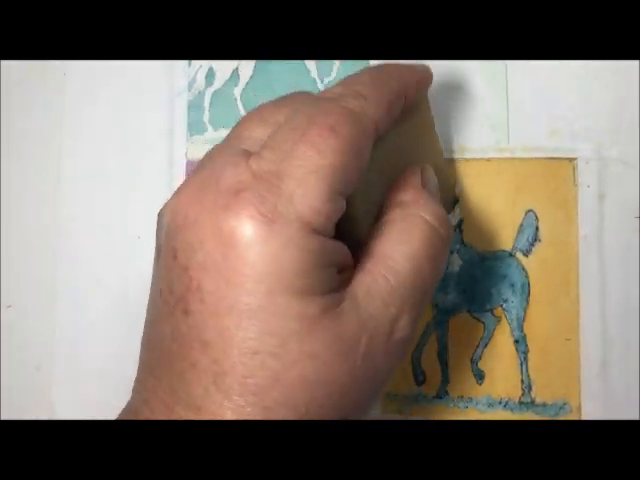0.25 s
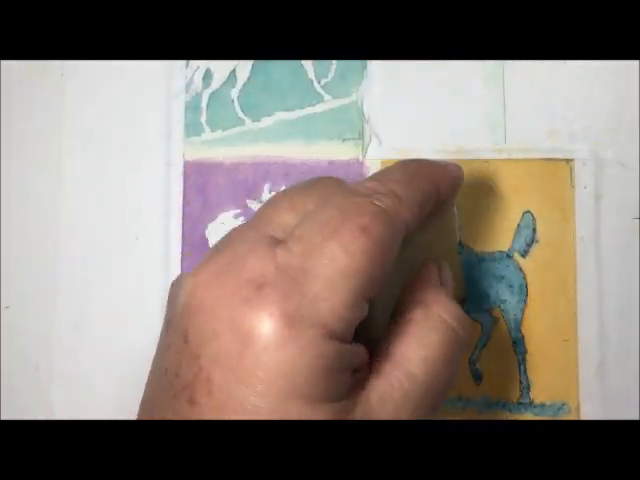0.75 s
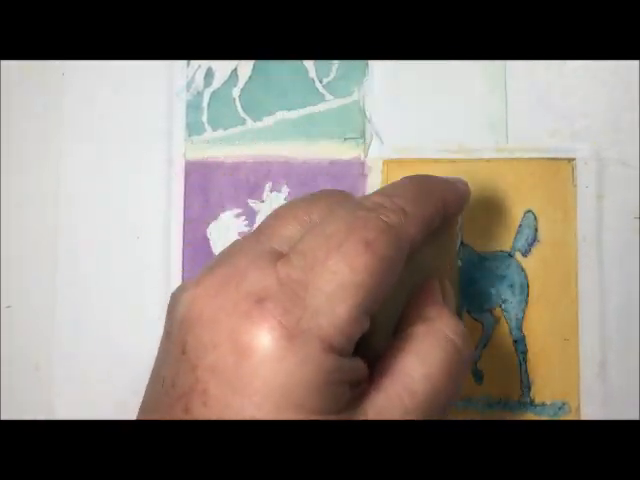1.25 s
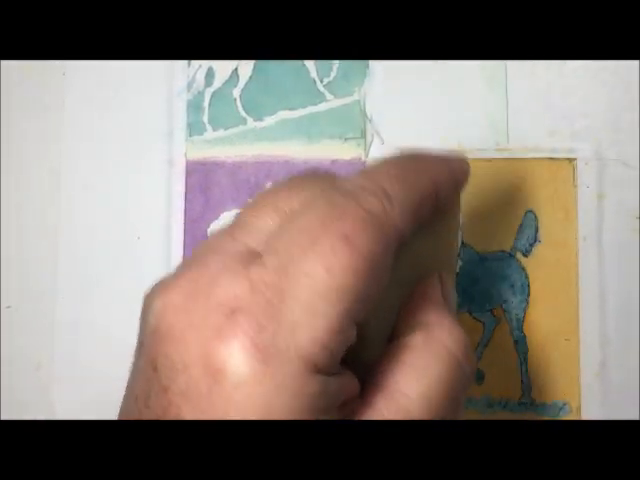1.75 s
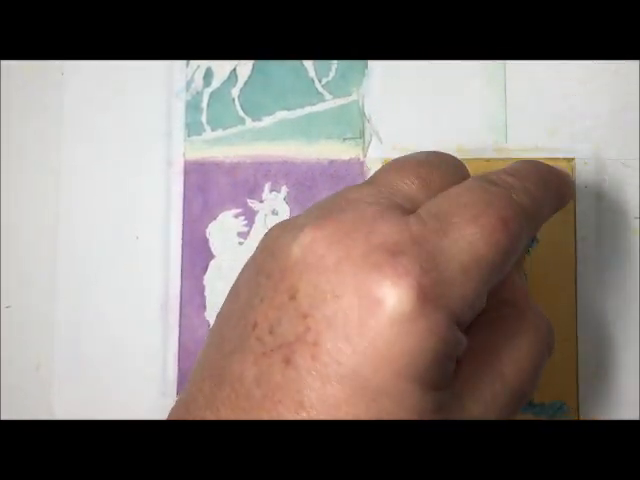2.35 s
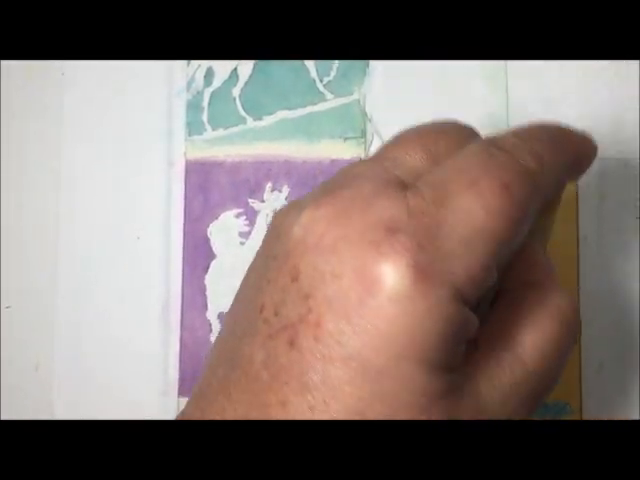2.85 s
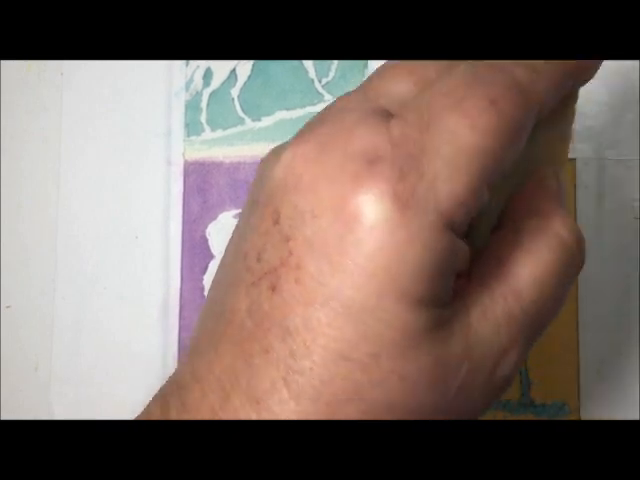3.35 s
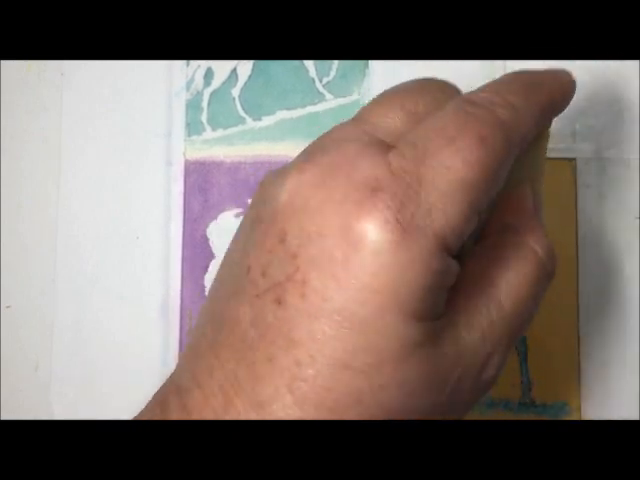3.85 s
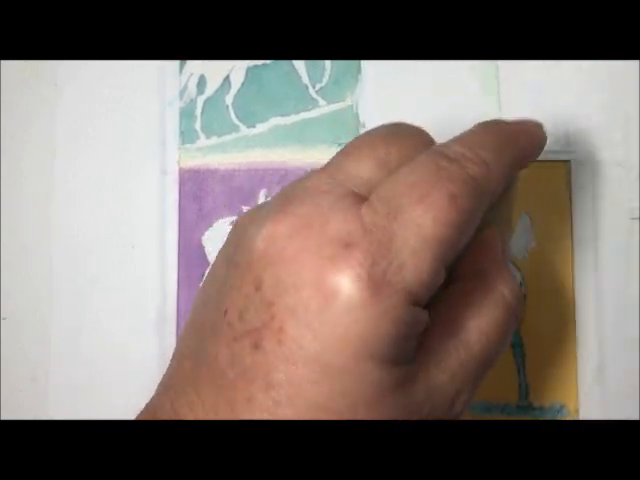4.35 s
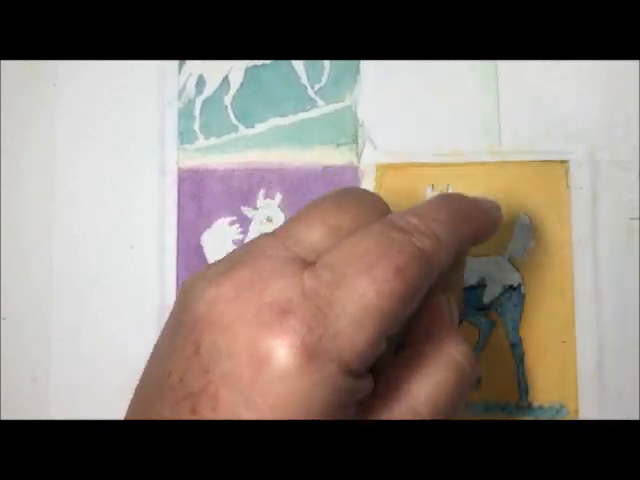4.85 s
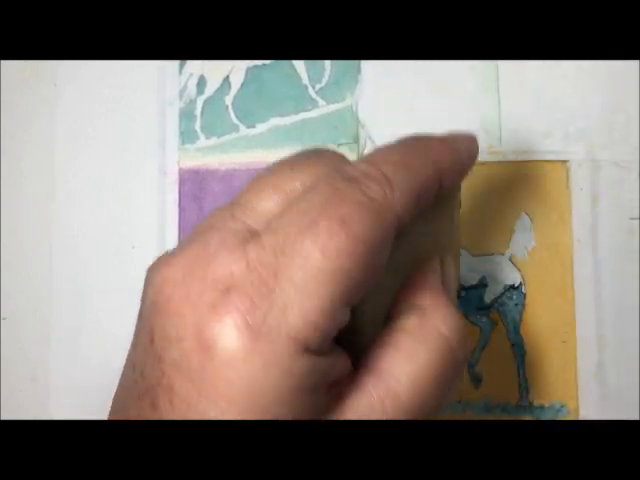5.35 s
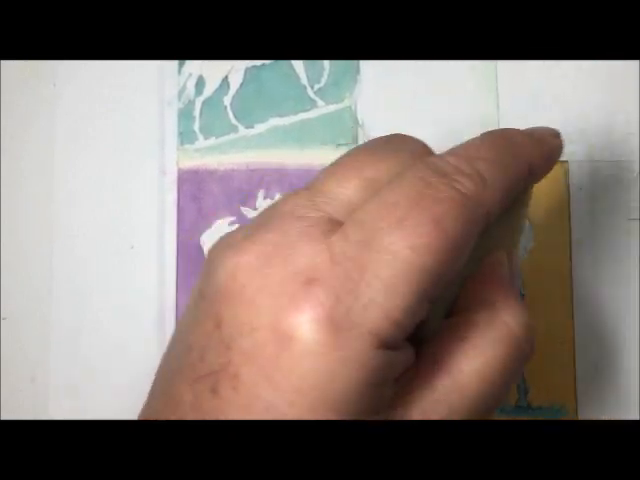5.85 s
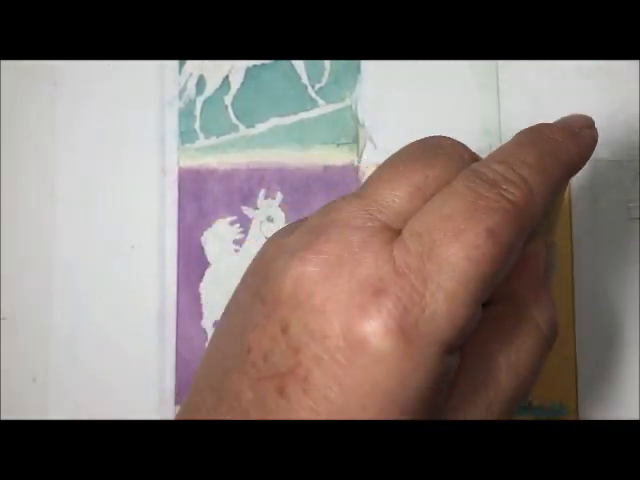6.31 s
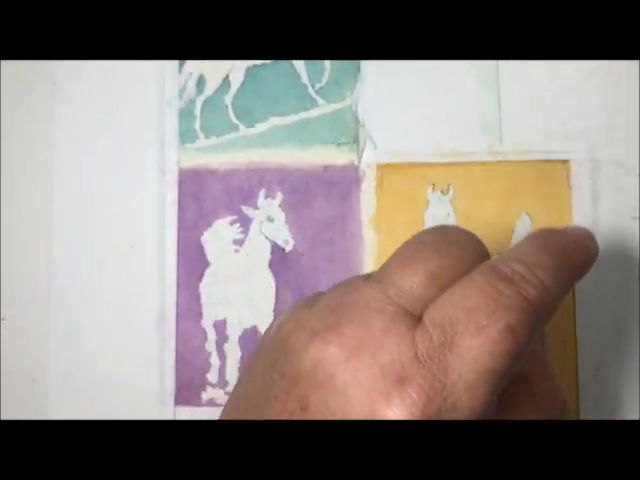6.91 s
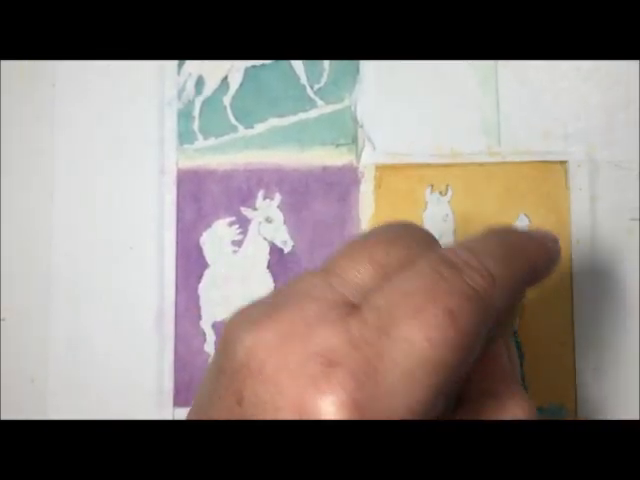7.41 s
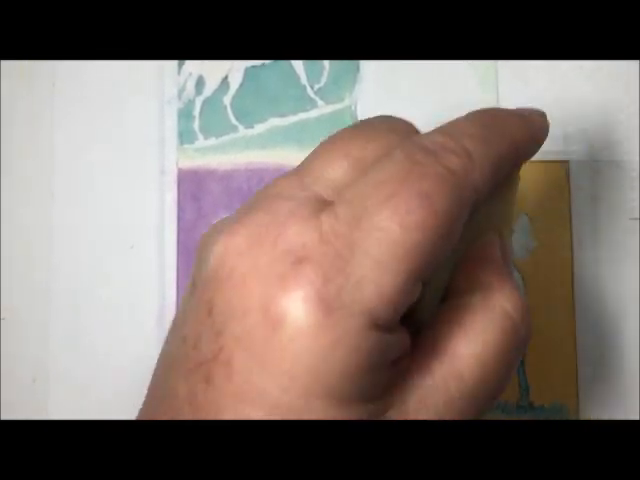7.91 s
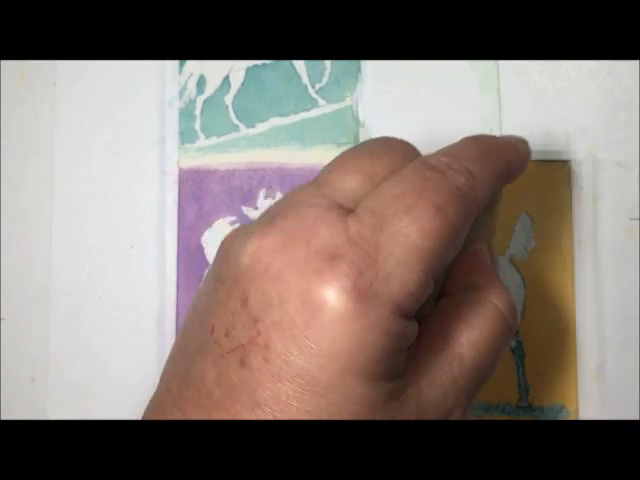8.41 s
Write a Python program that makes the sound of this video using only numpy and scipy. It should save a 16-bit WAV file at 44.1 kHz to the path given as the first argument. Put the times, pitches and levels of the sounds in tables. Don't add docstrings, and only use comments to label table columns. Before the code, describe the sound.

A rubber pad scrapes dried masking film off paper in short crisp strokes, tearing and snapping sharply, with soft table thuds over a low hum.

```python
import sys
import numpy as np
from scipy import signal
from scipy.fft import rfft, irfft, next_fast_len
from scipy.io import wavfile
from scipy.ndimage import uniform_filter1d, map_coordinates

SR = 44100
rng = np.random.default_rng(int(sys.argv[2]) if len(sys.argv) > 2 else 0)


def amplitude_ratio(level_db):
    exponent = np.asarray(level_db, float) / 20
    return 10 ** exponent


def bounce(signal):
    frames = np.transpose(np.atleast_2d(signal))
    limited = np.clip(frames, -1, 1)
    pcm = np.round(limited * 32767).astype(np.int16)
    wavfile.write(sys.argv[1], SR, pcm)


N = 382347


def unit(x):
    return x / np.sqrt(np.mean(x ** 2) + 1e-20)


def along(points, hz):
    f, value = np.transpose(points)
    return np.interp(np.log(hz + 1), np.log(f + 1), value)


def wobble(rate):
    knots = rng.standard_normal(int(N * rate / SR) + 4)
    return map_coordinates(knots, [np.arange(N) * rate / SR])


def filtered(x, response):
    m = next_fast_len(N + SR // 2)
    return irfft(rfft(x, m) * response(np.fft.rfftfreq(m, 1 / SR)), m)[..., :N]


def noise(spectrum):
    return unit(filtered(rng.standard_normal(N), lambda hz: amplitude_ratio(along(spectrum, hz))))


def resonate(x, modes, order=2):
    def once(hz):
        total = 0
        for k, (centre, width, db) in enumerate(modes):
            damping = 1j * hz * width
            total = total + (-1) ** k * amplitude_ratio(db / order) * damping / (centre * centre - hz * hz + damping)
        return total

    click = filtered(signal.unit_impulse(N), lambda hz: once(hz) ** order)
    return filtered(x, lambda hz: once(hz) ** order) / np.abs(click).max()


def bursts(times, db, life, build=0.00014, crack=5.7):
    k = np.arange(-SR // 50, SR // 50)
    t = k / SR
    build = np.clip(np.reshape(build, (-1, 1)), 1e-4, .008)
    swell = amplitude_ratio(np.where(t < 0, 10 * t / build, -60 * t / life))
    shape = rng.standard_normal((len(times), len(t))) * swell - crack * (k == 0)
    shape /= np.linalg.norm(shape * amplitude_ratio(-20 * np.abs(t) / 0.013), axis=1, keepdims=True)
    where = np.round(np.asarray(times) * SR).astype(int)[:, None] + k + SR
    return np.bincount(where.ravel(), (shape * amplitude_ratio(db)[:, None]).ravel(), N + 2 * SR)[SR:SR + N]


def rings(s, db, ring_hz, build, t60):
    k = np.arange(-SR // 200, SR // 60)
    t = k / SR
    stray = np.cumsum(.05 * rng.standard_normal((len(s), len(t))), axis=1)
    phase = 2 * np.pi * ring_hz[:, None] * t + stray
    swell = np.where(t < 0, 10 * t / np.clip(build[:, None], 5e-5, .008), -60 * t / t60)
    where = np.round(s * SR).astype(int)[:, None] + k
    return np.bincount(where.ravel(), (amplitude_ratio(db[:, None] + swell) * -np.sin(phase)).ravel(), N + SR)[:N]


def grit(slips, spread_db, smooth, clump_db):
    chance, size, side = rng.random((3, N))
    slip = (chance < slips / SR) * amplitude_ratio(-spread_db * np.log(size + 0.00033)) * np.sign(side - .5)
    clumps = amplitude_ratio(clump_db * (wobble(45) + wobble(170)))
    return unit(clumps * (unit(slip) + smooth * rng.standard_normal(N)))


def steadied(force, span_s, top):
    power = np.abs(uniform_filter1d(force ** 2, round(span_s * SR)))
    return np.clip(force / np.sqrt(power + 1e-3), -top, top)


# frequency in Hz, level in dB per Hz.
HUM_SPECTRUM = [(15, -69), (30, -23), (58, -5.5), (100, -11), (148, 4.5), (172, -11.5), (197, 0.5),
                (235, -11.5), (300, -9.5), (400, -35), (900, -120)]
# frequency in Hz, level in dB per Hz.
AIR_HISS_SPECTRUM = [(210, -32), (350, -9.5), (480, -19), (570, -14.5), (823, -14.5), (1930, -19),
                     (3800, -23.5), (4850, -25), (5600, -25), (9500, -28.5), (10500, -34.5), (11500, -28.5),
                     (15500, -33.5), (17000, -28)]


def background():
    z = signal.stft(noise(HUM_SPECTRUM), nperseg=2048)[2]
    field = uniform_filter1d(rng.standard_normal(z.shape), size=2, axis=0)
    field = unit(uniform_filter1d(field, size=3, axis=1))
    hum = signal.istft(z * amplitude_ratio(3 * field), nperseg=2048)[1][:N]
    hum = unit(amplitude_ratio(1.5 * wobble(5) + 2 * wobble(15)) * hum)
    return amplitude_ratio(-54.5) * hum + amplitude_ratio(-69.5 + 0.23 * wobble(1.572)) * noise(AIR_HISS_SPECTRUM)


def ramp(t, start, end, up, down):
    return up * np.minimum(t - start, 0) - down * np.maximum(t - end, 0)


# start in seconds, length in seconds, scrape level in dB, hiss level in dB.
DRAGS = [(0.022, 0.06, -45, -55.5), (0.432, 0.11, -51, -64.5), (0.529, 0.026, -55.5, -53),
         (0.896, 0.0071, -41.5, -49), (0.946, 0.079, -54, -61.5), (1.346, 0.037, -53, -74.5),
         (1.395, 0.04, -45.5, -52.5), (1.54, 0.055, -42.5, -64), (1.82, 0.034, -42, -49.5),
         (2.209, 0.0094, -50, -80), (2.458, 0.12, -50, -62), (2.897, 0.12, -50, -59),
         (3.318, 0.16, -52, -61), (3.714, 0.055, -56.5, -71.5), (3.808, 0.093, -48, -55.5),
         (4.203, 0.13, -45.5, -55.5), (4.626, 0.093, -48, -53.5), (5.016, 0.11, -51, -60.5),
         (5.377, 0.052, -47.5, -57.5), (5.442, 0.042, -52.5, -52.5), (5.515, 0.077, -49.5, -52),
         (5.705, 0.24, -58.5, -62.5), (5.912, 0.076, -43.5, -50), (6.677, 0.076, -49.5, -59),
         (6.847, .02, -49.5, -56.5), (7.115, 0.057, -45.5, -51.5), (7.493, 0.081, -49, -55),
         (7.874, 0.071, -48.5, -57.5), (7.937, 0.06, -51, -61), (8.296, 0.12, -46, -51.5)]
# peak in seconds, scrape level in dB, hiss level in dB.
PEELS = [(0.615, -34, -44), (1.055, -49.5, -45.5), (1.53, -39, -45), (1.901, -33.5, -39),
         (2.545, -57, -54.5), (2.632, -45, -52), (3.394, -43.5, -50.5), (4.226, -34, -43),
         (5.029, -41.5, -45.5), (5.17, -36, -39), (5.805, -40, -50.5), (5.953, -37.5, -47.5),
         (6.135, -36, -50.5), (6.76, -38, -45), (7.522, -37, -50.5)]
HISS_STEEPER = 1.07


def contact(steeper, column):
    grip, lift = 755.5, 701
    t, power = np.arange(0, N + 64, 64) / SR, 1e-12
    for s, length, *db in DRAGS:
        bite = ramp(t, s, s + length, grip, lift)
        landing = -12 + ramp(t, s, s, 146, lift)
        power = power + amplitude_ratio(db[column] + steeper * bite) ** 2 + amplitude_ratio(db[column] + steeper * landing) ** 2
    for s, *db in PEELS:
        power = power + amplitude_ratio(db[column] + steeper * ramp(t, s, s, 594.5, 703.5)) ** 2
    return np.interp(np.arange(N) / SR, t, 10 * np.log10(power))


# time in seconds, frequency in Hz.
SINGING_PLACE = [(0.45, 2350), (1.0, 2450), (1.56, 2098), (2.2, 2790), (2.95, 2663), (3.45, 2740),
                 (4.3, 2280), (5.5, 2350), (5.56, 1630), (5.65, 2300), (6.7, 2864), (7.55, 2900),
                 (8.4, 2715)]


def patchy(x, patchy_db, sing_db=0):
    hz, t, z = signal.stft(x, SR, nperseg=256)
    field = uniform_filter1d(rng.standard_normal(z.shape), size=3, axis=0)
    field = uniform_filter1d(field, size=14, axis=1)
    singing_hz = np.interp(t, *np.transpose(SINGING_PLACE))
    lift = np.exp(-((hz[:, None] - singing_hz) / 450) ** 2)
    return signal.istft(z * amplitude_ratio(patchy_db * unit(field) + sing_db * lift), nperseg=256)[1][:N]


# centre in Hz, width in Hz, level in dB.
SHEET_MODES = [(690, 783, -5), (932, 707, 2.5), (1342, 454, 1.5)]
BODY_MODES = [(1600, 360, -8), (2324, 386, 0.5), (2850, 312, 0.5), (3170, 290, 0), (3775, 440, -9.5)]
CRISP_MODES = [(4335, 920, -2.5), (5470, 834, 0.5), (6800, 1720, -5.5)]
AIR_MODES = [(8060, 2200, -4), (12000, 5900, -1), (16140, 7700, -4)]


def scrape():
    scrape_db, hiss_db = contact(1, column=0), contact(HISS_STEEPER, column=1)
    force = grit(slips=1800, spread_db=3, smooth=.4, clump_db=3.2)
    force = steadied(force, span_s=.035, top=11)
    fine = force + .8 * grit(slips=2000, spread_db=3, smooth=.3, clump_db=3.2)
    fine = steadied(fine, span_s=.035, top=9)
    low = unit(resonate(force, BODY_MODES)) + amplitude_ratio(-9.0) * unit(resonate(force, SHEET_MODES))
    between = amplitude_ratio((scrape_db + hiss_db) / 2 - 10.5) * unit(resonate(fine, CRISP_MODES))
    hiss = amplitude_ratio(hiss_db - 5.5) * unit(resonate(fine, AIR_MODES))
    grain = amplitude_ratio(scrape_db - 8.0) * low + between
    return patchy(grain, patchy_db=4.5, sing_db=3) + patchy(hiss, patchy_db=3.5)


def crumbs():
    crumbs_per_s = 600
    place, size = rng.random((round(crumbs_per_s * N / SR), 2)).T
    s = .01 + place * (N / SR - .02)
    both_db = contact(0.99, column=0) + contact(HISS_STEEPER, column=1)
    level_db = both_db[(s * SR).astype(int)] / 2
    ring_hz = np.clip(3800 * np.exp(.45 * rng.standard_normal(len(s))), 1200, 14000)
    db = level_db - 4 - 4 * np.log(size + .01)
    on = level_db > -68
    return rings(s[on], db[on], ring_hz[on], np.full(on.sum(), .0002), t60=0.0038)


# peak in seconds, peak in dB, ring in Hz, crisp level and air level in dB relative to the peak.
RIPS = [(0.6282, -18, 3170, 4, -2.5), (0.9477, -24, 2450, 0.5, 0.5), (1.0629, -22, 2310, -1.5, -3),
        (1.527, -24, 2210, 0, -8), (1.5356, -20, 2380, -1.5, -12), (1.5387, -26, 2260, 6.5, -6),
        (1.895, -9, 2160, -6.5, -7.5), (1.8976, -15, 2230, -5, -11.5), (2.538, -33, 2410, -1, 12.5),
        (2.6221, -15, 2330, -1.5, -8.5), (3.0435, -30.5, 1410, 7, -2.5), (3.4758, -27.5, 2260, -4, -14),
        (3.8372, -24.5, 2250, -10, -10.5), (3.8794, -18, 2330, -3.5, -13),
        (4.6634, -25.5, 2510, -12.5, -2.5), (5.109, -26.5, 2440, -11, -15), (5.1405, -27, 2290, -1, -7.5),
        (5.1684, -16.5, 2410, -17, -5.5), (5.171, -22.5, 2260, 6, -1.5), (5.5359, -27.5, 2140, 0, -12),
        (5.5506, -25, 1660, -7, -16), (5.9059, -23.5, 2270, 0.5, -11), (5.9345, -24.5, 2260, -1.5, -12),
        (5.943, -7, 2270, -16, -25), (5.9658, -26, 2200, -16, -12), (5.9784, -20.5, 2150, 0, -12.5),
        (6.093, -33, 2300, -7, -13), (6.1149, -24, 3060, -8, -24), (6.1275, -22.5, 3150, -7, -24),
        (6.1348, -12, 2380, 2.5, -10.5), (6.7608, -22.5, 2450, -16, 1.5), (6.85, -30, 2280, 3.5, -8),
        (6.8656, -23.5, 2330, -0.5, -11), (7.1564, -25.5, 2890, -5.5, 12), (7.5497, -29, 3550, 11.5, 11),
        (8.4314, -20.5, 2100, -14, -9)]
SNAPS = [(0.0447, -34.5, 3310, -11.5, 6), (0.5482, -36, 2260, -3.5, 0.5), (0.5843, -42, 3290, 4, -10.5),
         (0.6015, -26.5, 3110, -15, -21), (0.609, -33, 3780, -5.5, -22), (0.612, -39, 3230, 1.5, -12),
         (0.6149, -36, 3160, -3.5, -9), (0.624, -35, 3170, -5, -9.5), (0.988, -34, 2540, -13, -11),
         (1.0393, -36, 2370, 0, -11), (1.0537, -28.5, 2420, -1, -3), (1.4278, -31.5, 2530, -1.5, 1.5),
         (1.5072, -39.5, 2310, 2, 9), (1.515, -29, 2150, -9, -16), (1.5238, -22, 2250, -5, -14),
         (1.571, -33, 2387, -6, -15), (1.5936, -28, 2170, -22, -27), (1.8192, -39.5, 2560, -1, 2),
         (1.8456, -36, 3650, -7.5, -10), (2.55, -33.5, 2750, -14, -9.5), (2.922, -36, 2750, -1.5, 3),
         (3.0038, -33, 1640, -11.5, -4), (3.036, -34, 2340, 5, -5), (3.3858, -43.5, 2270, -0.5, 17),
         (3.4248, -27.5, 2550, -8, -4), (3.4593, -35, 1420, -2, -7), (3.4665, -45, 2800, 3, -5.5),
         (3.8244, -33.5, 2790, -10, 1), (3.8625, -29.5, 1393, -14, -13), (4.243, -33, 2310, -7, -14),
         (4.2735, -29.5, 1750, -2.5, 2), (4.2896, -30.5, 2200, -12, -2), (4.323, -41, 2390, -11, -13),
         (4.3492, -41.5, 2070, 6, -2), (4.6325, -33, 2590, -11, -6), (4.6593, -29.5, 2480, -5, -5.5)]
LATE_SNAPS = [(4.6825, -28, 2230, -18, -14), (4.6949, -31, 3220, -13, -12), (5.0157, -45.5, 3610, 4, 14.5),
              (5.049, -26, 2570, -13, -3.5), (5.0514, -25.5, 2520, -8.5, -8.5),
              (5.0591, -32, 2390, -6, -9.5), (5.0924, -25.5, 2560, -6, -8), (5.1572, -43, 2290, 7, 2),
              (5.4604, -41, 3230, 7, 11), (5.472, -40.5, 2400, 2, -1), (5.5119, -37.5, 2290, 4.5, 12),
              (5.526, -37, 2280, 4, -9), (5.562, -32, 2370, 2.5, -14), (5.5814, -36, 3060, 6, 1.5),
              (5.7896, -46, 2350, -3, 14), (5.8074, -33.5, 2250, -8, -6), (5.9506, -24.5, 2250, -6, -4),
              (5.9619, -37.5, 3040, -0.5, -9), (5.9707, -27, 2260, -7, -8), (5.973, -24.5, 2350, -9, -6),
              (6.6824, -37.5, 2500, -11, -5.5), (6.7312, -39.5, 2820, -12, 10.5),
              (6.8372, -38, 2260, -5, -15), (6.8531, -28, 2750, -5, -17), (6.856, -34, 2220, 3, -1),
              (7.1715, -41.5, 3600, -1, 6), (7.5197, -38.5, 3120, -12.5, -11),
              (7.5302, -28.5, 2830, -13, -10), (7.5707, -47, 3600, 11, 12), (7.9316, -31.5, 3740, -3.5, 3),
              (7.9934, -34, 2300, -2, -1), (8.3306, -37.5, 2270, 3.5, -0.5),
              (8.3702, -25.5, 2260, -1.5, -8), (8.3908, -39, 3180, 3, 1), (8.4175, -43, 2290, -3, -13),
              (8.4256, -36.5, 3140, 2.5, -18)]
CRACKLES = [(0.069, -34, 3570, 2, 4.5), (0.62, -36, 3120, -4, -16), (0.9712, -33.5, 3170, -12.5, -12),
            (1.0572, -33.5, 2310, -1, -8), (1.4091, -31.5, 3300, -2, -7.5), (1.5184, -31, 2100, 3, -5),
            (1.5297, -30, 2380, 11, -4), (1.5575, -23, 2270, -19, -22), (1.564, -35, 2233, -19.5, -26.5),
            (1.5793, -35, 2460, -2, -20), (1.8244, -38, 2490, -18, -15),
            (1.8431, -33.5, 2340, -10.5, -12.5), (1.8493, -37, 2280, -10, -14),
            (2.52, -48, 2450, -13.5, -7), (2.5537, -30.5, 2270, -14.5, -7), (2.5684, -31, 2260, -3, -3),
            (3.0072, -39, 2310, -13, -1), (4.2094, -30.5, 1410, -7, -8.5), (4.2151, -32, 1730, -6, -7),
            (4.2182, -32, 1394, -13, -12), (4.2202, -29, 1790, -6.5, -13), (4.228, -34.5, 1670, -13, -13),
            (4.3524, -38.5, 2155, -7, -2), (4.6655, -27, 2660, -15, -12), (4.6788, -32, 3200, -11, -9),
            (4.692, -35, 2200, -4.5, -8), (5.097, -25.5, 2500, -8, -2), (5.1625, -36, 2255, 2, 2),
            (5.4203, -34.5, 2330, -7.5, -11.5), (5.5728, -34, 2340, -6, -13), (5.9123, -37, 2310, 2, -5.5),
            (5.9248, -32.5, 2300, 4, -11), (5.982, -30.5, 1520, -12.5, -14), (7.9338, -35.5, 3360, 3.5, 2),
            (8.3564, -36.5, 2250, -1, -3), (8.3627, -25, 2360, -6, 1.5)]
# peak in seconds, peak in dB, crisp level and air level in dB relative to the peak.
FLECKS = [(0.132, -42.5, -7, 2), (0.985, -34, -14, -9), (1.17, -65, 5, -8), (1.305, -54, -1, -8),
          (1.4862, -40.5, -4.5, 2), (1.662, -50, -6.5, -3), (2.214, -55, -20, -36), (2.443, -45, -8, -8),
          (2.4865, -37, -4, -6), (2.601, -46, 0, -8), (2.794, -54, -5, -0.5), (4.265, -42, -4, -2),
          (4.336, -44, -2, -6), (4.344, -45, 0, -6), (5.765, -52, 2, 6), (5.775, -50, 2, 4),
          (5.833, -46, 2, -2), (5.848, -48, 3, -4), (5.891, -40, -4, -10), (3.912, -44.5, 7.5, -8),
          (4.13, -53.5, -1.5, 2), (3.648, -49.5, -22.5, -33), (3.706, -45, -6.5, -24),
          (4.746, -33.5, -3, -9), (5.311, -56, 0, -14.5), (5.64, -34.5, -6, -17), (5.749, -53.5, 1, 13),
          (6.6157, -52, 3, 0), (6.988, -45.5, -9.5, -5.5), (7.209, -44, -9, -6), (7.39, -55, 2, -5),
          (7.6, -49, -4, -14), (8.613, -54, -5, -12), (8.651, -54, 4.5, -2)]
# peak in seconds, peak in dB.
FLEXES = [(0.6273, -25), (1.0638, -40.5), (1.5159, -34.5), (1.5358, -38.5), (1.5382, -36), (1.896, -45.5),
          (1.8968, -35.5), (2.6228, -25.5), (3.0433, -35), (3.4764, -37.5), (3.8631, -36.5), (3.879, -47),
          (4.2124, -37.5), (4.2169, -39), (4.2226, -28), (4.227, -40), (5.1672, -40), (5.171, -28.5),
          (5.943, -27.5), (5.9647, -34.5), (5.982, -40.5), (6.1294, -35.5), (6.1346, -23.5),
          (6.8659, -32.5), (7.5495, -33.5), (8.431, -33)]
BUILD_MS = {"rip": .2, "snap": .25, "crackle": 1.7, "fleck": .6}
CRACK = {"rip": 16, "snap": 9, "crackle": 2.5, "fleck": 3}


def snaps():
    flecks = []
    for s, db, crisp, air in FLECKS:
        flecks.append((s, db, np.interp(s, *np.transpose(SINGING_PLACE)), crisp, air))
    kinds = [("rip", RIPS), ("snap", SNAPS), ("snap", LATE_SNAPS), ("crackle", CRACKLES), ("fleck", flecks)]
    rows = [(*row, BUILD_MS[kind] / 1000, CRACK[kind]) for kind, table in kinds for row in table]
    s, db, ring_hz, crisp_db, air_db, build, crack = np.transpose(rows)

    def tear(db, life, sharp=1):
        return bursts(s, db, life, build, sharp * crack[:, None])

    body = rings(s, db - 5.0, ring_hz, build, t60=.015)
    body = body + resonate(tear(db - 3.0, life=0.014), BODY_MODES, order=1)
    flex = bursts(*np.transpose(FLEXES), life=.012, crack=6.5)
    sheet = resonate(amplitude_ratio(0.4) * flex + tear(db - 22.5, life=0.013), SHEET_MODES)
    crisp = resonate(tear(db + crisp_db - 2.0, life=0.013, sharp=.6), CRISP_MODES)
    crisp = crisp + rings(s, db + crisp_db - 6.5, rng.normal(5300, 600, len(s)), build, t60=0.0053)
    air = resonate(tear(db + air_db, life=0.013, sharp=0.35), AIR_MODES)
    return body + sheet + crisp + air


# start in seconds, peak in dB.
TICKS = [(0.061, -50), (0.417, -52.5), (0.915, -44), (1.542, -57), (2.04, -49.5), (2.385, -44),
         (2.932, -47), (3.358, -48.5), (3.577, -62), (3.713, -45.5), (4.021, -52), (4.291, -44),
         (4.572, -44), (4.725, -42.5), (5.123, -45), (5.855, -52), (6.016, -49.5), (6.656, -45),
         (7.143, -42), (7.847, -54), (7.953, -46.5), (8.334, -45)]
# frequency in Hz, level in dB, 60 dB decay in seconds.
FRAME_MODES = [(583, 1.5, 0.035), (630.5, -12, 0.05), (740, -6.5, 0.025)]


def ticks():
    out, t = np.zeros(N + SR), np.arange(SR // 8) / SR
    bend = 1 + .06 * np.exp(-t / .008)
    for s, db in TICKS:
        ring = 0
        for hz, level, t60 in FRAME_MODES:
            decay = amplitude_ratio(level + rng.normal(0, 4) - 60 * t / t60)
            ring = ring + decay * np.sin(2 * np.pi * hz * t * bend)
        out[round(s * SR):][:len(t)] += amplitude_ratio(db + 1) * ring * (1 - np.exp(-t / .003))
    return out[:N]


# peak in seconds, thud level in dB, board rumble level in dB.
PUSHES = [(0.062, -48, -66), (0.557, -51.5, -68.5), (0.946, -45.5, -61.5), (1.418, -49.5, -63),
          (1.832, -52.5, -67), (2.511, -44, -54.5), (2.944, -50, -67.5), (3.437, -49, -63.5),
          (3.867, -49.5, -65), (4.233, -53, -55.5), (4.665, -52.5, -59.5), (5.059, -48.5, -59),
          (5.45, -55, -68), (5.838, -57, -74), (6.748, -54, -59.5), (6.99, -55.5, -67),
          (7.156, -53.5, -66.5), (7.557, -49.5, -67.5), (7.92, -53.5, -64.5), (8.377, -49, -63.5)]
# frequency in Hz, level in dB per Hz.
THUD_SPECTRUM = [(25, -47), (48, -8.5), (90, -2.5), (200, -3.5), (350, -23), (700, -92.5)]
# centre in Hz, width in Hz, level in dB.
RUMBLE_MODES = [(411, 27, -5.5), (720, 162, 0.5), (1030, 170, -7.5)]


def pushes():
    s, *db = np.transpose(PUSHES)
    swells = np.exp(-((np.arange(N) / SR - s[:, None]) / 0.058) ** 2)
    thud, rumble = amplitude_ratio(db) @ swells
    force = grit(slips=350, spread_db=4, smooth=1.1, clump_db=4.0)
    force = steadied(force, span_s=0.17, top=5)
    return thud * amplitude_ratio(3.0) * noise(THUD_SPECTRUM) + rumble * unit(resonate(force, RUMBLE_MODES))


# time in seconds, peak in dB.
EDGE_HITS = [
    (4.2178, -23),
]
# centre in Hz, width in Hz, level in dB.
BOARD_MODES = [(156, 76, 2), (340, 190, 1), (752, 300, 2.5), (1250, 870, -7.5)]


def thump():
    knocks = [(s, db - 15) for s, db in FLEXES]
    s, db = np.transpose(list(EDGE_HITS) + knocks)
    return resonate(bursts(s, db, life=0.041), BOARD_MODES)


# frequency in Hz, 60 dB decay in seconds.
ROOM_DECAY = [(300, 0.56), (1000, 0.059), (3000, 0.12), (10000, 0.059)]


def room(x):
    hz, t, z = signal.stft(rng.standard_normal(SR // 3), SR, nperseg=256)
    decay = amplitude_ratio(-60 * t / along(ROOM_DECAY, hz)[:, None])
    tail = signal.istft(z * decay, SR, nperseg=256)[1]
    answer = amplitude_ratio(-20.0) * np.pad(tail / np.linalg.norm(tail), (round(0.0067 * SR), 0))
    ceiling = bursts([.0102], np.zeros(1), life=0.004)
    answer += amplitude_ratio(-17.5) * ceiling[:len(answer)]
    return signal.fftconvolve(x, answer)[:N]


def scene():
    near = scrape() + crumbs() + snaps() + thump() + ticks()
    return (near + room(near) + pushes() + background())[None]


def roll_off(x):
    return signal.sosfilt(signal.butter(12, 16970, fs=SR, output="sos"), x)


def record(dry):
    top_hz = 16000
    mix = filtered(dry, lambda hz: np.clip((top_hz + 400 - hz) / 800, 0, 1) ** 2)
    return roll_off(mix)


dry = scene()
out = record(dry)
bounce(out)
```